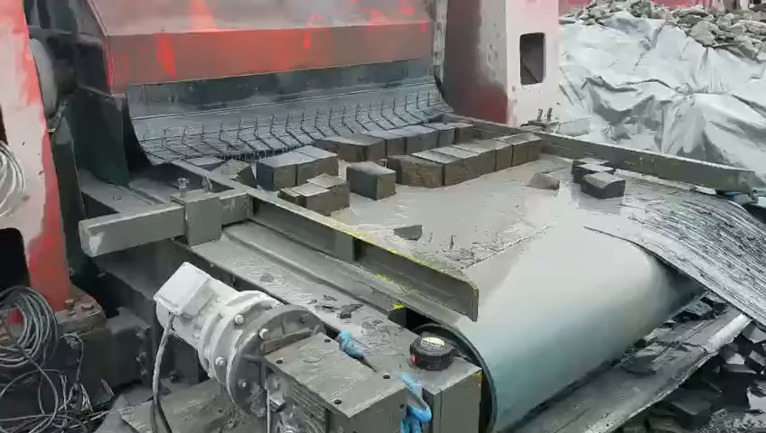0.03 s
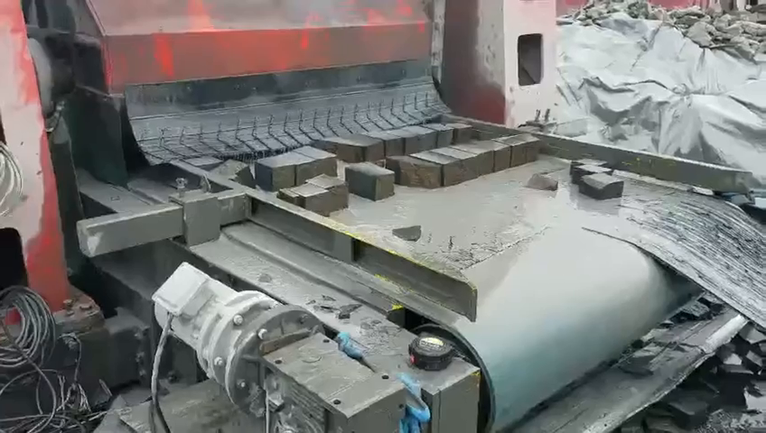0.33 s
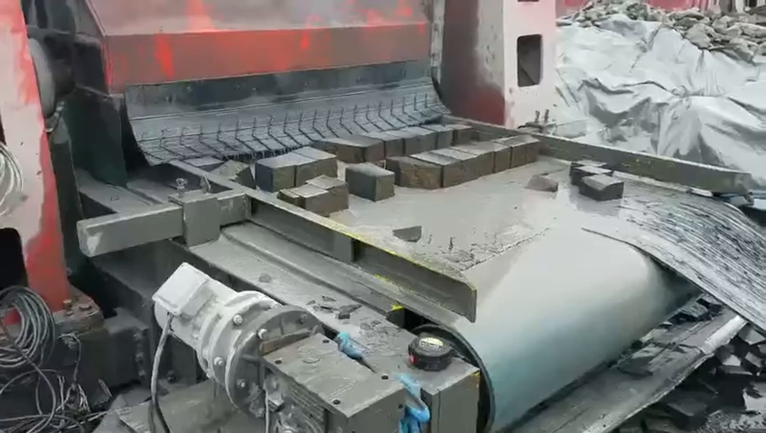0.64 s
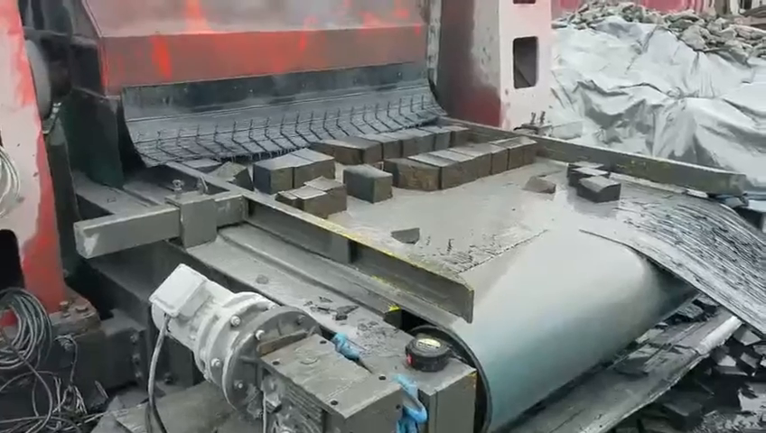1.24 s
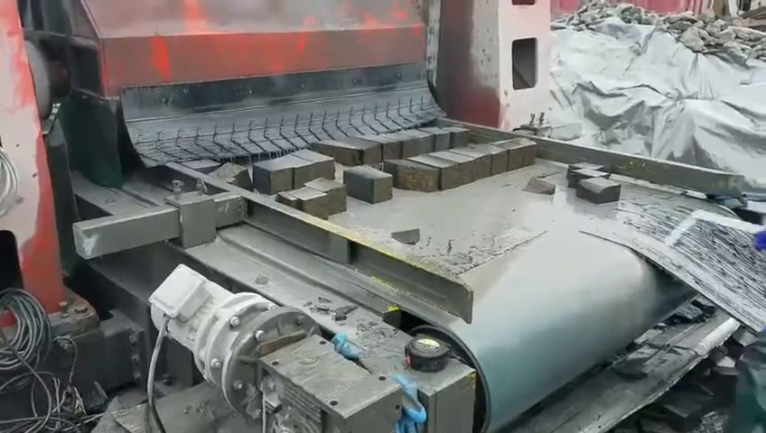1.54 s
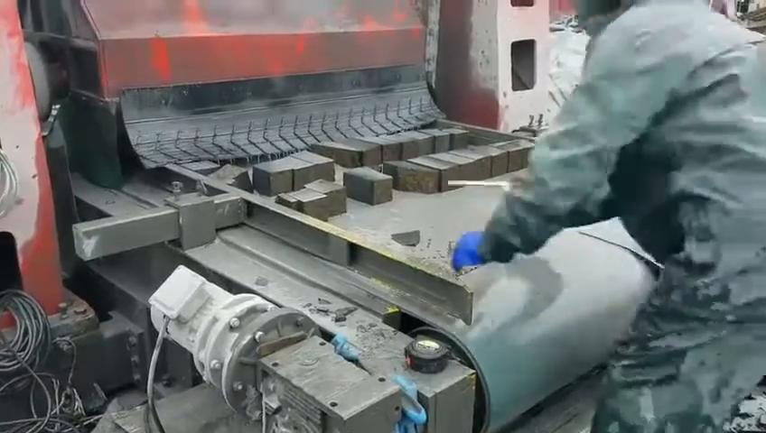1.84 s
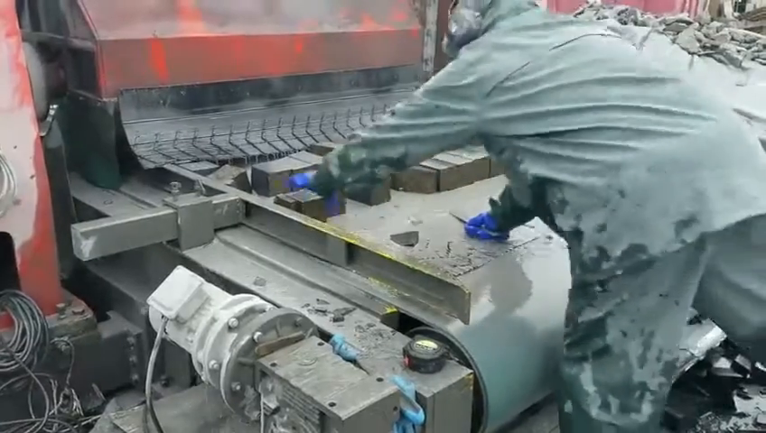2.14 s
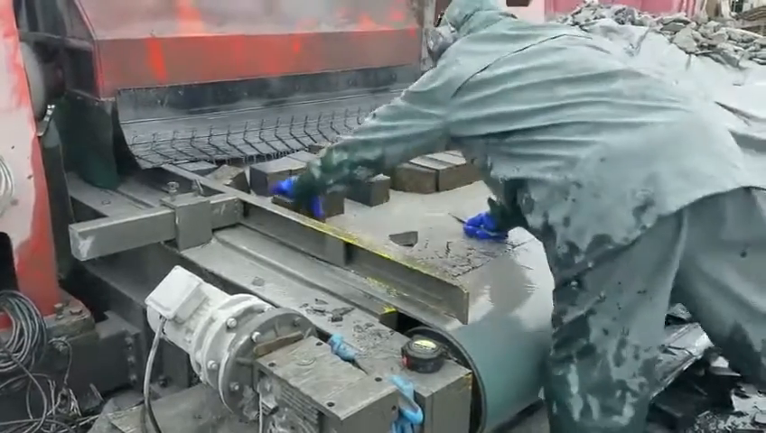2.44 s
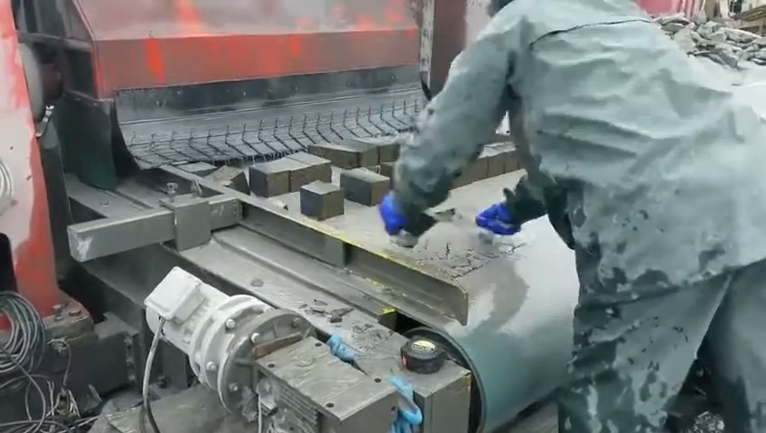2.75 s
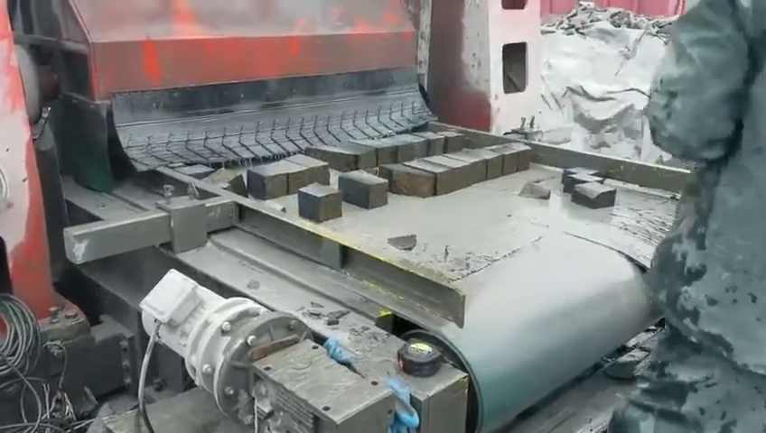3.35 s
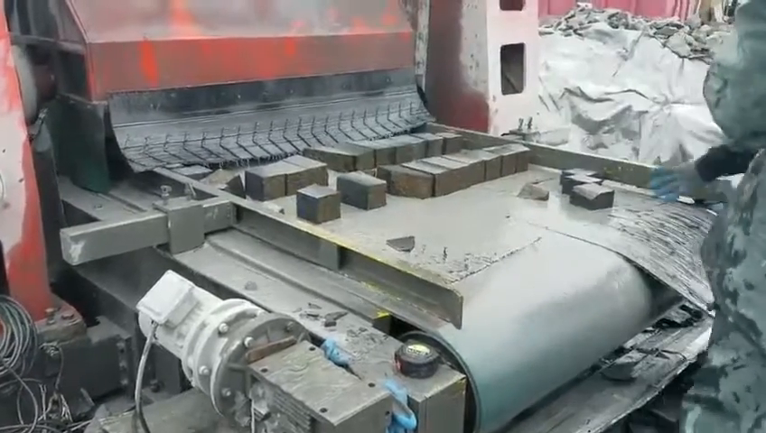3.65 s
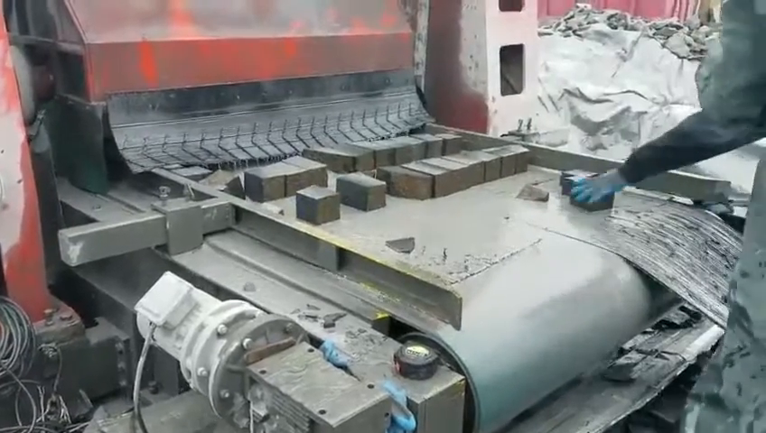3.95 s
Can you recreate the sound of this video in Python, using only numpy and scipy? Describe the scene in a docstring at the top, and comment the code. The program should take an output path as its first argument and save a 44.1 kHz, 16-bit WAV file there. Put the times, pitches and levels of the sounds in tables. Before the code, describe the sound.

A large stone saw runs with a loud grinding roar and a steady whine.

```python
"""In a wet workshop, a large stone saw runs. Its blades grind out nearly the same noise on every turn,
with a strong steady whine, brief steel rings and a pulsing squeal that grows towards the end.
The shaking frame roars and rumbles underneath, and cooling spray hisses on top.
A feed motor hums while the belt moves the cut blocks forward, then runs down."""
import sys
import numpy as np
from scipy import signal
from scipy.fft import rfft, irfft
from scipy.io import wavfile
from scipy.ndimage import uniform_filter1d

SR = 44100
rng = np.random.default_rng(int(sys.argv[2]) if len(sys.argv) > 2 else 0)


def store_wav(level_fs):
    """Save 16-bit WAV to argv[1]."""
    pcm = np.round(np.clip(np.atleast_2d(level_fs), -1, 1) * 32767)
    wavfile.write(sys.argv[1], SR, pcm.T.astype(np.int16))


N = 176400
T, HZ = np.arange(N) / SR, np.fft.rfftfreq(N, 1 / SR)
TURN_HZ = 19.475  # blade turns per second

# Stereo balance of the hall. Each row: frequency in Hz, left minus right in dB.
BALANCE = [(40, 4), (120, 0), (500, -1.5), (800, -2), (1500, -7.5), (2000, -6), (3000, -1), (4000, -4),
           (6700, -3), (7400, -10), (8200, -27.5), (9100, 25), (11000, -4), (12500, 3), (15500, 1)]
# Phase between the sides. Each row: frequency in Hz, lead of the left side in radians.
LEFT_LEAD = [(30, -0.11), (100, -0.34), (300, -0.23), (550, 0.17), (1050, 0.71), (1600, 1.43), (2100, 0.11),
             (4000, 0.39), (6000, -0.24)]


def amp(db):
    """Decibels to gain."""
    return 10 ** (np.asarray(db) / 20)


def unit_rms(x):
    """Scales a signal to unit rms."""
    return x / np.sqrt(np.mean(abs(x) ** 2) + 1e-20)


def over_hz(table, column=1):
    """One column of a table along log frequency."""
    columns = np.transpose(table)
    return np.interp(np.log(HZ + 1), np.log(columns[0] + 1), columns[column])


def over_time(table, column=1):
    """One column of a table along time."""
    columns = np.transpose(table)
    return np.interp(T, columns[0], columns[column])


def panned(db):
    """Constant-power gains, the left db above the right."""
    gains = np.array([amp(db / 2), amp(-db / 2)])
    return gains / np.sqrt(np.mean(gains ** 2, axis=0))


def drift(rate_hz):
    """A random wobble of unit rms, mostly slower than rate_hz."""
    spectrum = rfft(rng.standard_normal(N)) * (HZ > .5)
    return unit_rms(irfft(spectrum / (1 + (HZ / rate_hz) ** 2), N))


def hall_noise(gain):
    """Noise shaped by a gain per frequency, narrow in the bass and wide in the treble."""
    # Each row: frequency in Hz, correlation of left and right.
    correlation = [(50, 0.97), (300, 0.95), (650, 0.73), (1050, .85), (1350, 0.85), (1800, 0.38),
                   (2300, 0.21), (3000, -0.052), (3900, -0.39), (4600, 0.13), (8500, -0.15), (9600, -0.46),
                   (10700, 0.12), (15000, -0.03)]
    alike = over_hz(correlation)
    common, separate = rfft(rng.standard_normal((2, N))) * np.sqrt(SR / 2)
    left = common * np.exp(1j * over_hz(LEFT_LEAD))
    right = alike * common + np.sqrt(1 - alike ** 2) * separate
    return irfft(np.array([left, right]) * panned(over_hz(BALANCE)) * gain, N)


def hall_tone(hz, rate_hz, waver_db=1.5, wander_rad=1):
    """A wavering sine of unit rms, placed in stereo by its pitch."""
    phase = 2 * np.pi * hz * T + wander_rad * drift(rate_hz)
    lead = np.interp(hz, HZ, over_hz(LEFT_LEAD))
    pan_db = np.interp(hz, HZ, over_hz(BALANCE))
    pair = np.sin([phase + lead, phase]) * panned(pan_db)[:, None]
    return unit_rms(pair * amp(waver_db * drift(rate_hz)))


def grinding(waver_db=0.52, throb_db=-0.07):
    """Blade teeth scrape through wet stone, a touch harder once a turn."""
    # Gritty mids and highs. Each row: frequency in Hz, density in dB per Hz.
    spectrum = [(500, -86), (850, -64.5), (1050, -55), (1250, -61), (1450, -59.5), (1700, -56.5),
                (1880, -52.5), (2300, -56.5), (2500, -52), (2750, -56.5), (3400, -54.5), (3750, -51.5),
                (3950, -51), (4150, -52.5), (4800, -58), (6000, -60), (6850, -63), (7250, -54.5),
                (7900, -60), (8700, -69.5), (9600, -74), (12000, -102)]
    # Each row: time in seconds, gain in dB.
    fader = [(.1, 0.79), (.42, 1.2), (.7, -0.59), (1.3, 0.18), (2.15, -0.41), (2.45, 0.18), (2.9, -0.16),
             (3.35, -.4), (3.55, 0.55), (4, -0.62)]
    throb = throb_db * np.sin(2 * np.pi * TURN_HZ * T)
    level_db = over_time(fader) + waver_db * drift(rate_hz=15) + throb
    scrape = hall_noise(amp(over_hz(spectrum)) * turn_comb())
    return blade_shimmer(scrape) * amp(level_db)


def turn_comb():
    """Comb gains on multiples of the blade speed: each turn partly repeats the one before."""
    # Each row: frequency in Hz, share locked to the turn from 0 to 1, turns until the pattern renews.
    repetition = [(40, 0, 20), (170, 0.5, 10.5), (300, 0.4, 20), (500, 0.21, 11), (1430, 0.21, 29),
                  (1960, 0.81, 5.3), (2800, 0.34, 10), (4000, 0.59, 1.6), (6000, 0.24, 3.1),
                  (8000, 0, 0.77)]
    locked = over_hz(repetition)
    carry = np.exp(-1 / over_hz(repetition, column=2))
    comb = (1 - carry ** 2) / abs(1 - carry * np.exp(-2j * np.pi * HZ / TURN_HZ)) ** 2
    return np.sqrt(1 - locked + locked * comb)


def blade_shimmer(scrape, depth_db=1.2, band_hz=110, swell_s=.35):
    """Narrow bands rise and sink at random as different parts of the blades ring."""
    hz, times, bands = signal.stft(scrape, SR, nperseg=2048)
    patches = rng.standard_normal(bands.shape[1:])
    patches = uniform_filter1d(patches, int(swell_s / times[1]), axis=1)
    patches = uniform_filter1d(patches, int(band_hz / hz[1]), axis=0)
    return signal.istft(bands * amp(depth_db * unit_rms(patches)), SR, nperseg=2048)[1][:, :N]


def whine(hz=1076.2, wander_rad=.16, lead_rad=.44, flutter_db=-37.5, flutter_width_hz=36):
    """One strong tone of steady pitch inside a narrow band of flutter."""
    # Each row: time in seconds, level in dB, left minus right in dB.
    fader_and_pan = [(.1, -28, -4), (.5, -24, -3.5), (1, -23.5, -4), (1.4, -21.5, -2), (1.7, -22, -4),
                     (2.4, -20.5, -6.5), (2.8, -21, -5.5), (3.1, -20, -2), (3.6, -20.5, -2.5),
                     (4, -18.5, -1)]
    phase = 2 * np.pi * hz * T + wander_rad * drift(rate_hz=1)
    pair = np.sqrt(2) * np.sin([phase + lead_rad, phase]) * panned(over_time(fader_and_pan, column=2))
    flutter = unit_rms(hall_noise(1 / (1 + ((HZ - hz) / flutter_width_hz) ** 2)))
    return pair * amp(over_time(fader_and_pan)) + amp(flutter_db) * flutter


def frame_roar(waver_db=0.48):
    """The frame and guards shake with the turning blades."""
    # Broad low body. Each row: frequency in Hz, density in dB per Hz.
    spectrum = [(15, -85), (28, -81), (52, -64), (80, -60.5), (125, -54), (180, -54), (240, -51.5),
                (310, -54), (410, -58.5), (600, -57), (720, -61), (900, -61.5), (1400, -64.5), (3000, -84)]
    # Each row: time in seconds, gain in dB.
    fader = [(.1, -1.5), (.65, 0.4), (1.3, -0.1), (1.85, -1.5), (2.3, 1.5), (2.55, 0.5), (3, 0.6),
             (3.4, -1.5), (3.8, 0), (4, -1.5)]
    shake = hall_noise(amp(over_hz(spectrum)) * turn_comb())
    return shake * amp(over_time(fader) + waver_db * drift(rate_hz=21))


def cooling_spray(waver_db=0.9):
    """Cooling water thrown off the blades hisses unevenly."""
    # Airy top end. Each row: frequency in Hz, density in dB per Hz.
    spectrum = [(3000, -79), (9700, -98.5), (10150, -72.5), (10600, -64.5), (11700, -67.5), (12300, -58),
                (13250, -62.5), (13750, -55.5), (14500, -62), (15100, -60), (15700, -57.5)]
    # Each row: time in seconds, gain in dB.
    fader = [(.1, 0.11), (.5, 0.65), (1.25, 0.54), (2.2, -0.42), (3.1, -0.37), (4, 0.076)]
    hiss = hall_noise(amp(over_hz(spectrum)))
    return hiss * amp(over_time(fader) + waver_db * drift(rate_hz=16))


def feed_motor(lead_rad=-0.43):
    """The motor hums under load while the belt moves, then coasts to a stop."""
    # Each row: time in seconds, pitch in Hz, level in dB.
    run_down = [(.1, 96.5, -31), (.335, 98, -34), (.35, 95.5, -27), (.65, 95.7, -27.5), (.95, 96.3, -24),
                (1.36, 96.1, -23.5), (1.42, 90, -35), (1.48, 81, -51), (1.69, 57, -42), (1.85, 42.7, -57),
                (2, 35, -80)]
    phase = 2 * np.pi * np.cumsum(over_time(run_down)) / SR
    return np.sqrt(2) * np.sin([phase + lead_rad, phase]) * amp(over_time(run_down, column=2))


def blade_squeal(hz=1870, touch_at_s=3.55, sharpness=.95):
    """A blade rubs the side of its cut and squeals once in every turn."""
    # Each row: time in seconds, level in dB.
    fader = [(.1, -54), (2.7, -42), (3.1, -33), (3.4, -30), (3.62, -32), (3.72, -40), (4, -29)]
    blade_angle = 2 * np.pi * TURN_HZ * (T - touch_at_s)
    touch = unit_rms(np.exp(sharpness * np.cos(blade_angle)))
    return hall_tone(hz, rate_hz=16) * touch * amp(over_time(fader))


def steel_rings():
    """Narrow steel resonances swell and fade as the load on the blades shifts."""
    # Each row: centre in seconds, length in seconds, pitch in Hz, waver rate in Hz, top level in dB.
    swells = [(.4, .5, 4000, 20, -35), (.42, .25, 2940, 20, -37), (1.35, .25, 4170, 25, -35),
              (1.63, .2, 3700, 20, -35), (2.33, .5, 3720, 22, -36), (2.55, .8, 818, 2, -37),
              (2.63, .08, 1700, 14, -30), (2.635, .14, 1105, 10, -29), (2.87, .2, 4160, 22, -34.5),
              (3.93, .2, 2207, 14, -34)]
    ringing = np.zeros((2, N))
    for centre_s, length_s, hz, rate_hz, db in swells:
        swell = np.exp(-(2 * (T - centre_s) / length_s) ** 2)
        ringing += hall_tone(hz, rate_hz) * amp(db) * swell
    return ringing


def machine_tones(crossfade_s=(1.1, 1.6)):
    """Shaft, bearings and motors sing faint wavering tones whose balance shifts once."""
    # Each row: pitch in Hz, level before the crossfade in dB, level after it in dB.
    partials = [(175.3, -42, -38.5), (194.8, -39.5, -47), (272.6, -40.5, -44), (292.1, -41, -43),
                (471, -44, -48), (479.2, -46, -42), (548.8, -43.5, -37), (608.3, -36.5, -41.5),
                (617, -41, -43), (624.2, -48, -38), (818, -35.5, -39.5), (837.4, -47, -43.5),
                (1032.6, -45, -44), (1168.6, -47, -41.5), (1324.3, -39.5, -45.5), (2201, -44, -42),
                (3213.6, -42, -44), (3699, -44, -43), (4129, -43, -41.5), (5102, -42, -49)]
    drone = np.zeros((2, N))
    for hz, early_db, late_db in partials:
        level_db = np.interp(T, crossfade_s, [early_db, late_db])
        drone += hall_tone(hz, rate_hz=1.45, waver_db=2, wander_rad=0.48) * amp(level_db)
    return drone


def frame_rumble():
    """The heavy frame lays lumpy bass under everything."""
    # Deep low end. Each row: frequency in Hz, density in dB per Hz.
    spectrum = [(12, -83), (28, -77), (50, -61.5), (70, -58.5), (110, -75), (200, -95)]
    # Each row: time in seconds, gain in dB.
    fader = [(.1, -14), (.32, -12), (.42, -2), (1, -5), (1.5, -1), (1.7, 6.5), (2, 8), (2.2, -1),
             (2.55, 4.5), (3.1, -2), (3.5, -2), (3.8, 1), (4, 2)]
    return hall_noise(amp(over_hz(spectrum))) * amp(over_time(fader))


def scene():
    """All layers of the running saw, in stereo."""
    frame = frame_rumble() + frame_roar()
    blades = grinding() + blade_squeal() + steel_rings()
    return frame + blades + cooling_spray() + whine() + machine_tones() + feed_motor()


def record(dry):
    """The sound cuts in and comes up to full level, with the highest treble trimmed off."""
    start_s, rise_s, start_db, cutoff_hz = .105, 0.19, -3.5, 15770
    rise_db = np.interp(T, [start_s, start_s + rise_s], [start_db, 0])
    opened = dry * (T >= start_s) * amp(rise_db)
    low_pass = signal.firwin(1023, cutoff_hz, window=("kaiser", 7), fs=SR)
    return signal.oaconvolve(opened, low_pass[None], "same", axes=1)


dry = scene()
out = record(dry)
store_wav(out)
```